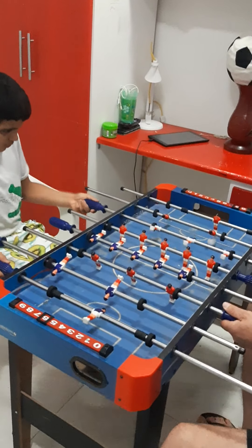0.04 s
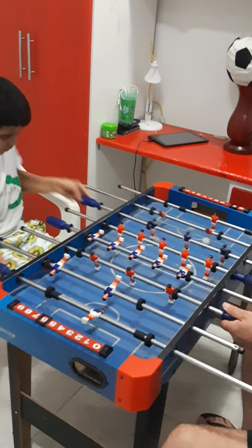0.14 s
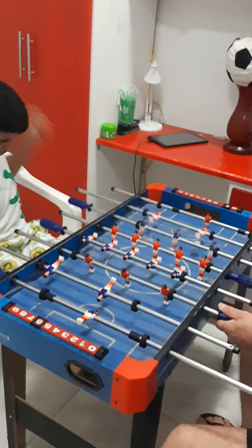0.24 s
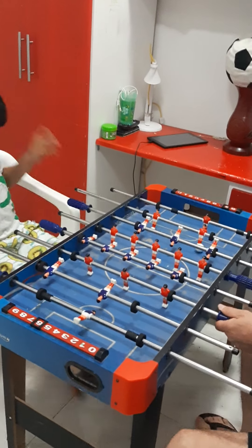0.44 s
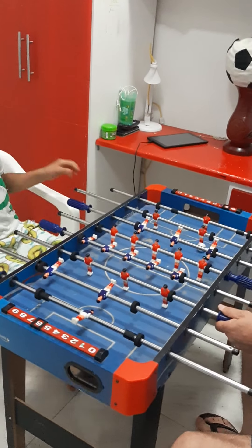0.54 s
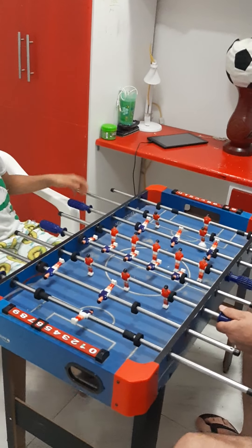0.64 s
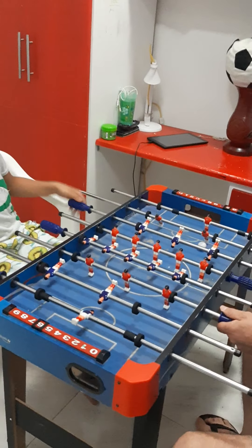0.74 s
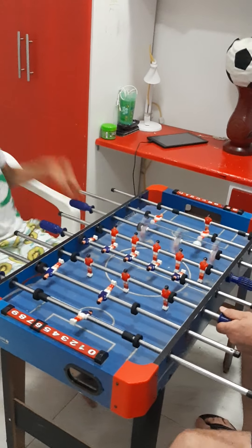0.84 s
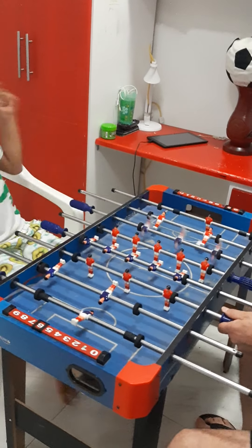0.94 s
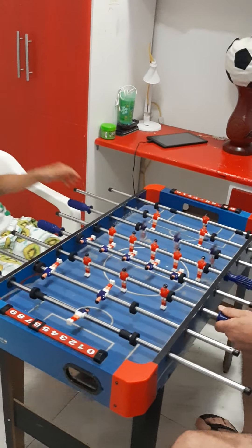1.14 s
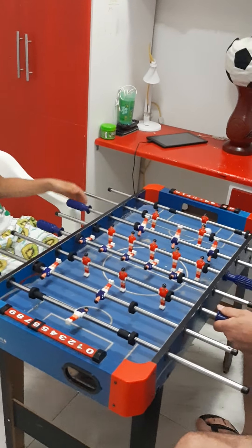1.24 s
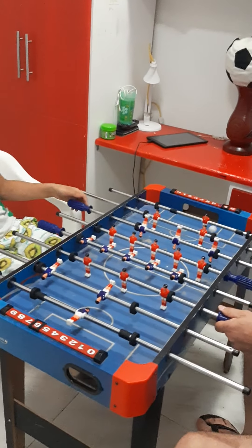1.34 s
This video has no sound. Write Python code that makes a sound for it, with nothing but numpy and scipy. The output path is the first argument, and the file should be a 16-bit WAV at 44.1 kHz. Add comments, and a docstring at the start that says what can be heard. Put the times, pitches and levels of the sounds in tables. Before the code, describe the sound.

A small table football game clacks and thumps in two quick bursts in a hard-walled room

```python
"""Foosball in a hard-walled room

A small foosball table, close to a phone with two unlike microphone ports. Plastic players clack on the ball:
a tap and rough contact ring their modes. Ball and rod stops push the hollow cabinet into resonance.
Steel rods ring high; sliding and spinning, they rumble in the cabinet and rattle in their bushings, as random
grains. The room adds a noise tail to each blow and to the rods, over steady air and a low wavering hum."""
import sys
import numpy as np
from scipy import signal
from scipy.fft import rfft, irfft, next_fast_len
from scipy.io import wavfile
from scipy.ndimage import map_coordinates

SR = 44100
rng = np.random.default_rng(int(sys.argv[2]) if len(sys.argv) > 2 else 0)


def attenuation_scalar(level_db):
    """Turn a level in dB into a linear amplitude multiplier (20 dB per decade)."""
    decades = np.asarray(level_db, float) / 20
    return 10 ** decades


def digitize_waveform(pressure):
    """Quantize a signal to 16-bit integers and store it at the path in sys.argv[1].

    Rows of a 2-D input are taken as channels; values are limited to [-1, 1].
    """
    field = np.atleast_2d(pressure).T
    bounded = np.clip(field, -1, 1)
    quanta = np.round(bounded * 32767).astype(np.int16)
    wavfile.write(sys.argv[1], SR, quanta)


N = 61739


def unit(x):
    """Scale to rms 1."""
    return x / np.sqrt(np.mean(x ** 2) + 1e-20)


def along(points, hz):
    """Interpolate (f/Hz, value) points on a log frequency axis."""
    f, v = np.transpose(points)
    return np.interp(np.log(hz + 1), np.log(f + 1), v)


def bump(hz, centre_hz, octaves):
    """A bell curve on the log frequency axis."""
    return np.exp(-(np.log2((hz + 1) / centre_hz) / octaves) ** 2)


def filtered(x, response):
    """Multiply the spectrum of x by a complex response of frequency."""
    n = x.shape[-1]
    m = next_fast_len(n + 8192)
    return irfft(rfft(x, m) * response(np.fft.rfftfreq(m, 1 / SR)), m)[..., :n]


def causal(gain_db):
    """Minimum-phase response with the given gain, by folding its cepstrum."""
    cepstrum = irfft(np.maximum(gain_db, -120) * np.log(10) / 20)
    half = len(cepstrum) // 2
    cepstrum[1:half] *= 2
    cepstrum[half + 1:] = 0
    return np.exp(rfft(cepstrum))


def add(out, s, x):
    """Mix x into out from time s."""
    part = out[:, round(s * SR):][:, :x.shape[1]]
    part += x[:, :part.shape[1]]


# how alike diffuse sound is on the left and right: (f/Hz, correlation)
LIKENESS = [(100, 0.98), (300, 0.95), (600, 0.27), (2000, 0.093), (12000, 0.14)]


def spread(pair):
    """Two unrelated signals mixed to left and right: alike in the bass, nearly unrelated above."""
    def mid_side_gains(hz):
        turn = np.arccos(np.clip(along(LIKENESS, hz), -1, 1)) / 2
        return np.sqrt(2) * np.array([np.cos(turn), np.sin(turn)])

    mid, side = filtered(pair, mid_side_gains)
    return np.array([mid + side, mid - side]) / np.sqrt(2)


# reverberation of the hard-walled room before its build-up: (f/Hz, t60/s)
ROOM_T60 = [(150, 0.39), (500, 0.36), (2000, 0.44), (10000, 0.25), (15000, 0.2)]
BUILD_S = 0.006  # time constant of the tail's onset


def in_room(x, wet_db, all_round=None):
    """A sound and the room's tail, drawn anew; the tail is fed by what goes out in all directions."""
    hz, t, z = signal.stft(rng.standard_normal((2, SR // 2)), SR, nperseg=256)
    decay = attenuation_scalar(-60 * t / along(ROOM_T60, hz)[:, None])
    tail = signal.istft(z * decay, SR, nperseg=256)[1]
    build_up = 1 - np.exp(-np.arange(tail.shape[1]) / SR / BUILD_S)
    tail = spread(tail * build_up)
    source = np.atleast_2d(x if all_round is None else all_round)
    wet = signal.fftconvolve(source, tail / np.linalg.norm(tail[0]), axes=1)
    direct = np.pad(x * np.ones((2, 1)), ((0, 0), (0, tail.shape[1] - 1)))
    return attenuation_scalar(wet_db) * wet + direct


# broad resonances of the hollow table: (f/Hz, width/Hz, level/dB)
CABINET_MODES = [(177, 75, -3.5), (242, 43, 1), (310, 38.4, 1.5), (379.5, 24, 0), (434.7, 47.3, -1.5),
                 (651, 150, -2.5), (808, 218, -3), (1207, 279, -7.5), (1320, 160, -6.5), (1770, 530, -15),
                 (2024, 97, -9.5), (2770, 1080, -24)]


def cabinet(hz):
    """Complex response of the hollow table: band-pass resonances summed with alternating sign."""
    total = 0
    for k, (centre, width, db) in enumerate(CABINET_MODES):
        resonance = 1j * hz * width / (centre * centre - hz * hz + 1j * hz * width)
        total = total + (-1) ** k * attenuation_scalar(db) * resonance
    return total


# spectrum of the still air in the room: (f/Hz, relative level/dB per Hz)
AIR_SPECTRUM = [(25, -38.5), (45, -9.5), (79, -17), (134, -9.5), (345, -11), (569, -22.5), (962, -30),
                (3000, -40), (8500, -53), (11500, -46.5), (16000, -54)]
AIR_DB = -47.5
HUM_HZ, HUM_DB, HUM_WAVER_DB = 58.5, -53.5, 3.5


def room_tone():
    """Steady air as coloured noise, and a low sine hum whose level wavers at random."""
    air = filtered(rng.standard_normal((2, N)), lambda hz: attenuation_scalar(along(AIR_SPECTRUM, hz)))
    air = unit(spread(air))
    t = np.arange(N) / SR
    waver = map_coordinates(rng.standard_normal(40), [t * 20])  # 20 random points a second
    hum = np.sqrt(2) * attenuation_scalar(HUM_DB + HUM_WAVER_DB * waver) * np.sin(2 * np.pi * HUM_HZ * t)
    return attenuation_scalar(AIR_DB) * air + hum


def grains(rate):
    """Random small impacts of uneven size for each side, rate of them per second."""
    struck = rng.random((2, N)) < rate / SR
    impacts = struck * rng.standard_normal((2, N))
    uneven_db = 2.5 * rng.standard_normal((2, N))
    return impacts * attenuation_scalar(uneven_db)


# rods sliding and spinning: (t/s, cabinet rumble level/dB, bushing rattle level/dB)
ROD_MOVES = [(0, -41.5, -41), (0.058, -55, -53), (0.141, -45.5, -55.5), (0.196, -36, -38.5),
             (.29, -35, -43.5), (0.388, -21.5, -27), (0.502, -36.5, -44), (0.599, -57, -58.5),
             (.68, -51.5, -59), (0.802, -57.5, -79), (.92, -37.5, -44), (1.016, -40, -27),
             (1.16, -46, -49.5), (1.258, -40, -44.5), (1.4, -49, -64)]
# spectrum of the bushings' chatter: (f/Hz, relative level/dB per Hz)
RATTLE_SPECTRUM = [(400, -19.5), (700, -5.5), (1500, -17), (2700, -17.5), (4900, -11), (9000, -21.5),
                   (11400, -16.5), (14600, -22.5), (16000, -31)]
RUMBLES_PER_S, RATTLES_PER_S = 500, 1100


def rods():
    """Moving rods shake the cabinet and chatter in their bushings: dense random impacts, filtered."""
    s, rumble_db, rattle_db = np.transpose(ROD_MOVES)
    t = np.arange(N) / SR
    shaken = spread(filtered(grains(RUMBLES_PER_S), cabinet))
    rumble = unit(in_room(shaken, wet_db=2.4)[:, :N])
    chatter = filtered(grains(RATTLES_PER_S), lambda hz: causal(along(RATTLE_SPECTRUM, hz)))
    rattle = unit(in_room(chatter, wet_db=1.3)[:, :N])
    return attenuation_scalar(np.interp(t, s, rumble_db)) * rumble + attenuation_scalar(np.interp(t, s, rattle_db)) * rattle


# blows on the cabinet, direct sound: (t/s, peak level/dB, tilt/dB per octave, struck panel's strongest f/Hz)
CABINET_BLOWS = [(0.024, -36.5, -10, 306), (0.213, -24, -7.5, 194.5), (.312, -14, 0, 214),
                 (.338, -13.5, 4, 824), (.361, -8.5, 4, 285), (.378, -12, 3.5, 1440),
                 (.445, -23.5, -2.5, 187), (.475, -24.5, -6.5, 182), (.935, -18, 1.5, 196),
                 (.992, -7, 5, 1405), (1.003, -17.5, -0.5, 331), (1.067, -25, -2.5, 310),
                 (1.109, -23, 0.5, 443), (1.144, -29.5, -1.5, 447), (1.254, -32.5, -5, 500)]
PANEL_DB, PANEL_OCT = 9, 0.22
KNOCK_ROOM_DB = 2


def knocks():
    """A short push into the cabinet's resonances, coloured by the panel that is struck."""
    out, t = np.zeros((2, N)), np.arange(SR // 8) / SR
    push = (t == 0).astype(float)
    for s, db, tilt_db, panel_hz in CABINET_BLOWS:
        def struck_panel(hz):
            tilt = tilt_db * np.log2((hz + 50) / 600)
            return cabinet(hz) * causal(tilt + PANEL_DB * bump(hz, panel_hz, PANEL_OCT))

        body = filtered(push, struck_panel)
        add(out, s, attenuation_scalar(db) * in_room(body / np.abs(body).max(), KNOCK_ROOM_DB))
    return out


# modes of the hollow plastic player: (f/Hz, boost/dB)
PLAYER_MODES = [(1530, 6), (2280, 6), (2820, 5), (3550, 7), (4450, 6), (5180, 7), (7100, 5)]
PLAYER_OCT = .08
FAVOUR_DB, FAVOUR_OCT = 5, .13


def player_modes(hz, favoured_hz):
    """Boost in dB from the figure's modes and from the frequency that this contact favours."""
    modes = sum(db * bump(hz, centre_hz, PLAYER_OCT) for centre_hz, db in PLAYER_MODES)
    return modes + FAVOUR_DB * bump(hz, favoured_hz, FAVOUR_OCT)


# partials of a struck steel rod: (f/Hz, relative level/dB, t60/s)
ROD_PARTIALS = [(11190, -5, .08), (11280, 0, .12), (11370, -2, .11)]


def rod_ring(t):
    """A steel rod rings as a cluster of high decaying sines, in random phase on each side."""
    ring = 0
    for hz, db, t60 in ROD_PARTIALS:
        phase = rng.random((2, 1))
        ring = ring + attenuation_scalar(db - 60 * t / t60) * np.sin(2 * np.pi * (hz * t + phase))
    return ring


# a player meets the ball: (t/s, level/dB, tilt/dB per octave, favoured f/Hz, rod ring level/dB before the first)
BALL_CONTACTS = [(0.0790, -31.5, -5.5, 5000, -22), (0.173, -26.5, -7, 5500, -31),
                 (0.2187, -24, -2.5, 1570, -32), (0.2567, -11.5, -3, 3910, -46),
                 (0.3068, -5.5, 0.5, 4170, -16.5), (0.8459, -32, -2, 2750, -16.5),
                 (0.8796, -14.5, -3, 5220, -32.5), (0.9208, -5.5, 1, 3326, -12)]
# plastic on the ball before tilt and modes: (f/Hz, relative level/dB per Hz)
CLACK_SPECTRUM = [(400, -29.5), (1400, -3.5), (3590, -1), (5300, -1.5), (7600, -5), (8500, -12.5),
                  (10000, -11), (12000, -3.5), (16000, -13.5)]
CLACK_DB, ROOM_DB = -22.5, 1.2
CONTACT_S, CHATTER_T60_S = .0028, .004  # rough contact holds, then dies away
CHATTER_DB = 1.5  # rough contact against clean tap
TILT_ENDS_HZ = 7000  # the tilt runs no further above this
HIDDEN_WHEN_SOFT = .15  # softer contacts reach the phone less directly, dB per dB


def clacks():
    """A tap and a few milliseconds of rough contact ring the figure's modes; the rod rings on in the room."""
    out, t = np.zeros((2, N)), np.arange(SR // 4) / SR
    contact = attenuation_scalar(-60 * np.maximum(t - CONTACT_S, 0) / CHATTER_T60_S)
    for s, db, tilt_db, favoured_hz, ring_db in BALL_CONTACTS:
        def colour(hz):
            tilt = tilt_db * np.log2(np.minimum(hz + 50, TILT_ENDS_HZ) / 4000)
            return causal(along(CLACK_SPECTRUM, hz) + tilt + player_modes(hz, favoured_hz))

        chatter = spread(rng.standard_normal((2, len(t)))) * contact
        chatter = unit(filtered(chatter, colour))
        tap = unit(filtered((t == 0).astype(float), colour))
        two_taps = np.array([tap, np.roll(tap, 2)])  # the right side lags by two samples
        burst = unit(two_taps + attenuation_scalar(CHATTER_DB) * chatter)
        # heard directly, the modes stand out more than in the room
        burst = unit(filtered(burst, lambda hz: causal(player_modes(hz, favoured_hz))))
        ring = attenuation_scalar(ring_db) * rod_ring(t)
        direct = attenuation_scalar(CLACK_DB + HIDDEN_WHEN_SOFT * db) * burst + ring
        all_round = attenuation_scalar(CLACK_DB) * tap + ring
        add(out, s, attenuation_scalar(db) * in_room(direct, ROOM_DB, all_round))
    return out


def scene():
    """The struck ball, the knocked cabinet and the moving rods in the quiet room."""
    return clacks() + knocks() + rods() + room_tone()


# the phone's two microphone ports differ: (f/Hz, left minus right level/dB)
PORT_DIFFERENCE = [(60, 2), (180, -0.5), (550, 0), (1650, 0), (4970, -5), (15000, 4)]
BASS_CUT_HZ = 40


def microphone_ports(dry):
    """Two unequal ports, each with a second-order bass cut."""
    def response(hz):
        bass_cut = (1j * hz / (1j * hz + BASS_CUT_HZ)) ** 2
        return bass_cut * attenuation_scalar(np.outer([.5, -.5], along(PORT_DIFFERENCE, hz)))

    return filtered(dry, response)


CEILING, TOP_HZ = .95, 16000  # soft overload level of full scale; band limit


def top_cut(x):
    """Nothing passes above the cut-off."""
    return signal.sosfilt(signal.butter(12, 16810, fs=SR, output="sos"), x)


def record(dry):
    """The phone's ports, soft overload and a band limit."""
    ports = microphone_ports(dry)
    held = ports / (1 + (ports / CEILING) ** 4) ** 0.25
    mix = filtered(held, lambda hz: hz < TOP_HZ)
    return top_cut(mix)


dry = scene()
out = record(dry)
digitize_waveform(out)
```